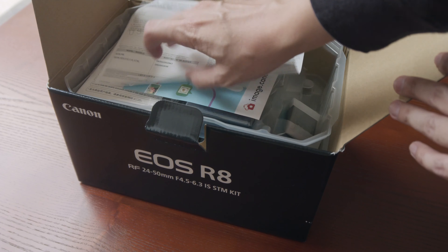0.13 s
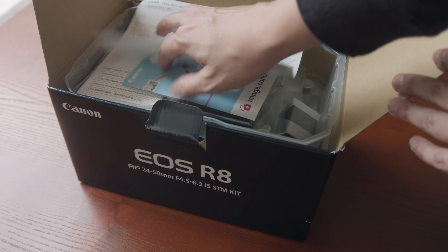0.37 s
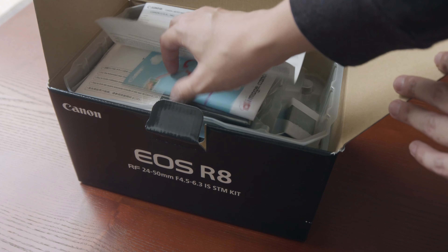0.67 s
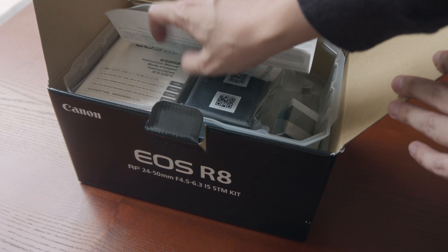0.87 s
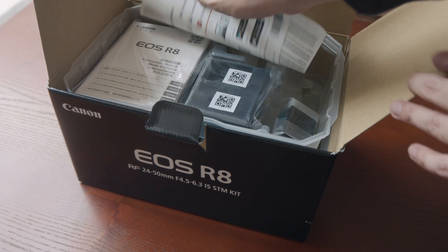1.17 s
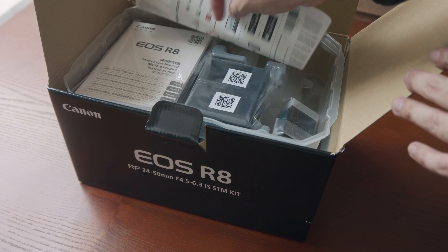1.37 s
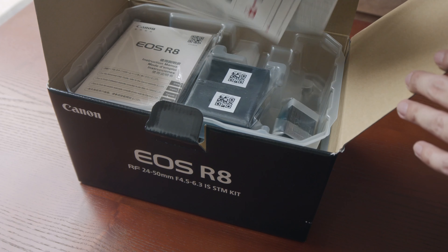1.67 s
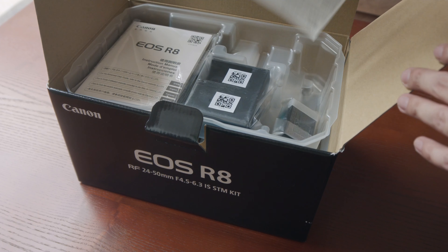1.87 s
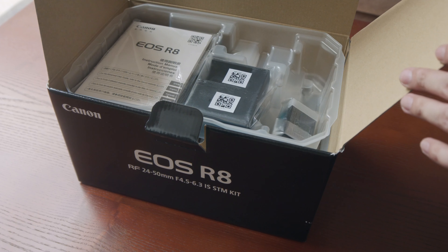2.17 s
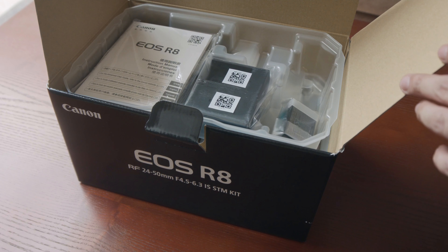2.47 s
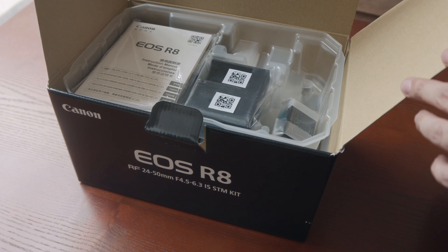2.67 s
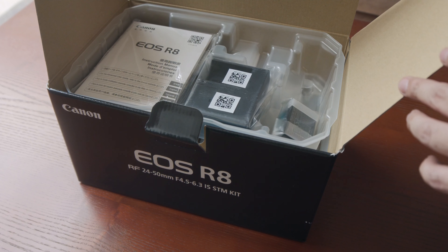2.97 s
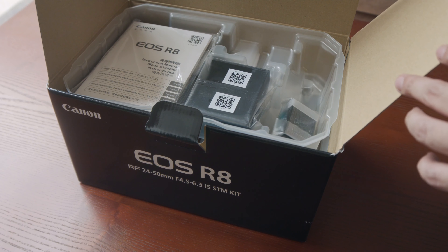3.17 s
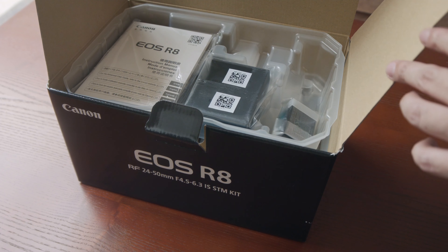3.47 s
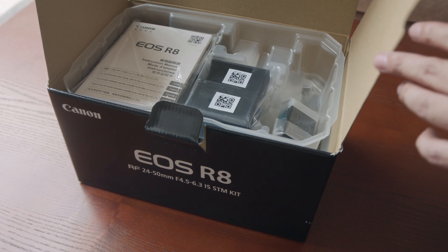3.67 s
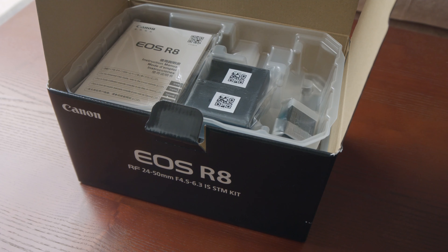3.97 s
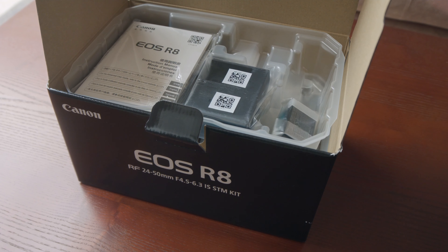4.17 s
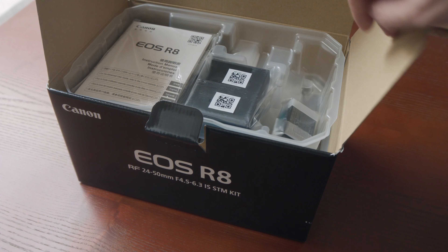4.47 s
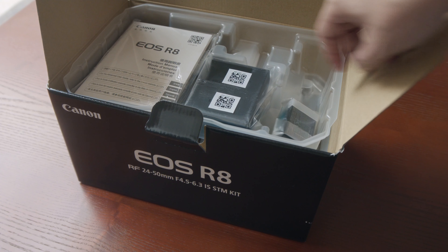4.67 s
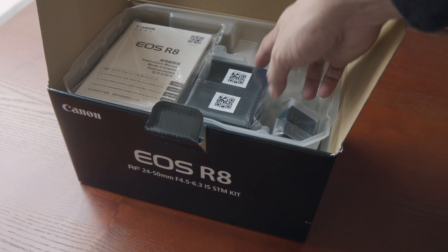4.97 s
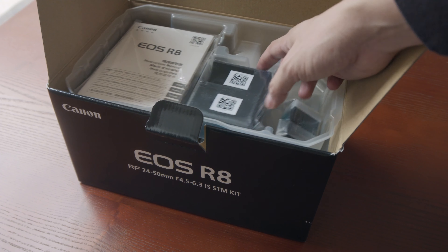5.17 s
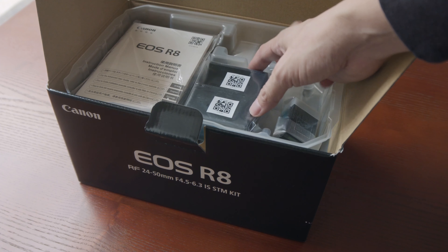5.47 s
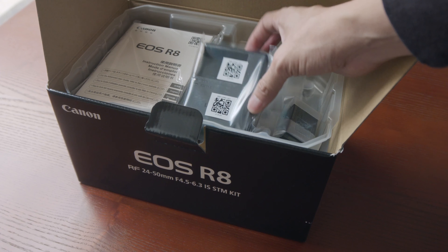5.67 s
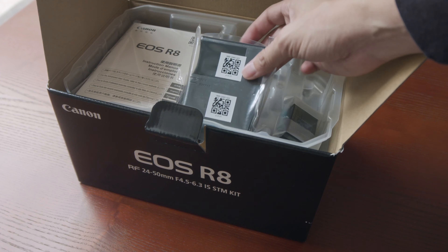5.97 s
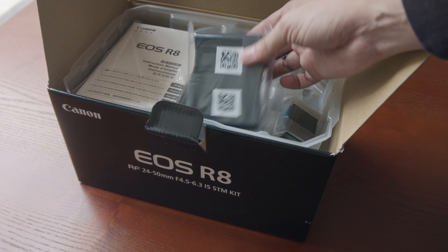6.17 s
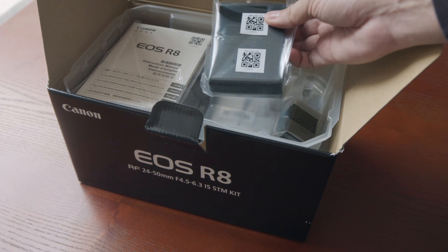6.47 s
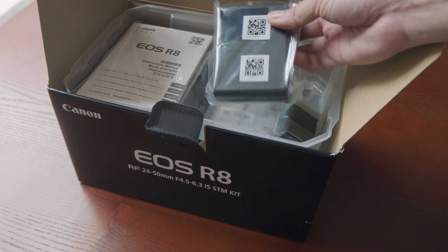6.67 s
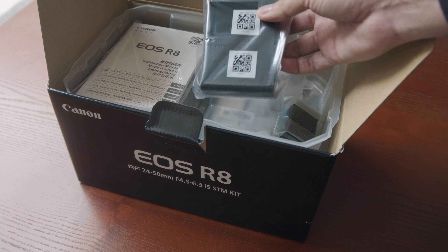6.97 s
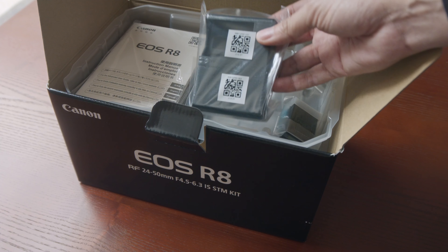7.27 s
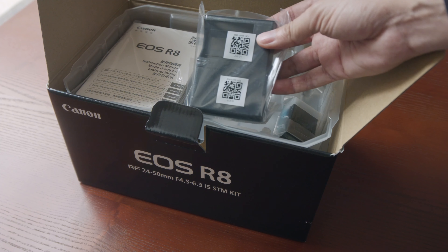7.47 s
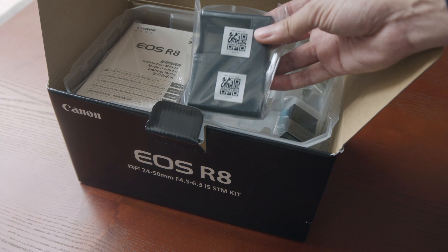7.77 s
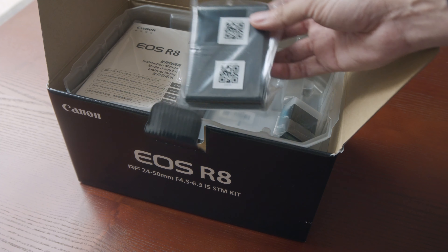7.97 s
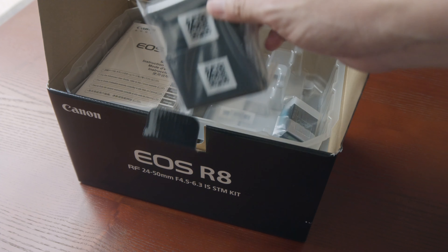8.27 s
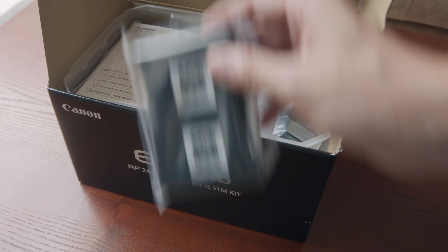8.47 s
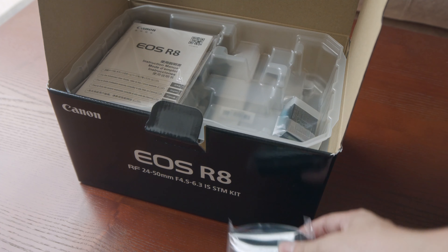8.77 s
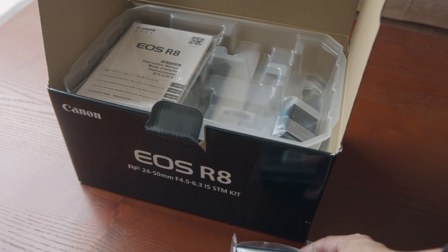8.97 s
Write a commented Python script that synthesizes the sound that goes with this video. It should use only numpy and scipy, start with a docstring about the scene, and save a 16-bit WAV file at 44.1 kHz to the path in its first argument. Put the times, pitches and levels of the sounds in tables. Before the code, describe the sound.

Close handling of papers and thin plastic film in a hollow box, with one sharp snap early on and a solid knock at the end.

```python
"""Hands lift leaflets, a flap and a film-wrapped packet out of a cardboard box on a table in a quiet room.
Creases snap as short cracks and rings of noise; sheets rub and crumple as thousands of tiny slips.
Knocks and rubbing set off the notes of the hollow box, and the hands leave a soft echo in the room.
Behind them an engine speeds up far outside as two low tones, over shaped noise for the room."""
import sys
import numpy as np
from scipy import signal
from scipy.fft import rfft, irfft
from scipy.io import wavfile
from scipy.ndimage import uniform_filter1d

SR = 44100
rng = np.random.default_rng(int(sys.argv[2]) if len(sys.argv) > 2 else 0)


def to_wav(sig):
    """Store sig (one row per channel, or 1-D mono) as 16-bit WAV at the path in sys.argv[1].

    Samples outside -1..1 are clipped; the rate is SR.
    """
    pcm = np.clip(np.atleast_2d(sig), -1, 1) * 32767
    pcm = np.round(pcm).astype(np.int16)
    wavfile.write(sys.argv[1], SR, pcm.T)  # frames by channels


N = 402191  # samples, about 9.12 s


def undb(db):
    """Turn decibels into a plain gain."""
    return 10 ** (np.asarray(db) / 20)


def unit(x):
    """Scale to an average (RMS) level of 1."""
    return x / np.sqrt(np.mean(x ** 2))


def peak(x):
    """Scale so that the largest swing is 1."""
    return x / np.abs(x).max()


def fall(t, t60):
    """A 1.1 ms rise on a fade that loses 60 dB in t60 seconds."""
    return np.exp(-np.log(1000) * t / t60) * np.minimum(t / 0.0011, 1) ** 2


def band(x, lo_hz, hi_hz, order=2):
    """Keep the sound between two pitches."""
    return signal.sosfilt(signal.butter(order, [lo_hz, min(hi_hz, .45 * SR)], "band", fs=SR, output="sos"), x)


def walk(rate):
    """A random level that takes new values rate times a second, smoothed twice; average size 1."""
    hold = int(SR / rate)
    steps = np.repeat(rng.standard_normal(N // hold + 1), hold)
    return unit(uniform_filter1d(uniform_filter1d(steps, hold), hold)[:N])


def curve(rows):
    """Read each table column at every sample, in straight lines between rows."""
    s, *columns = np.transpose(rows)
    return [np.interp(np.arange(N) / SR, s, c) for c in columns]


FILM_FROM_S = 6.2  # from here on the creases are in thin film: broader, with a fainter note
# Creases that snap: (time [s], peak level of the ring [dB], note of the ring [Hz],
# crack level against the ring [dB])
CREASES = [(0.086, -38, 1510, -23), (0.1062, -24, 1710, -28), (0.115, -24.5, 1510, -25),
           (0.247, -29, 3130, -30), (0.27, -26, 2620, -33), (0.442, -41, 1500, -20), (0.485, -34, 1300, -4),
           (0.517, -26, 2950, -28), (0.6047, -35, 1900, -25), (0.679, -29.5, 1200, -27),
           (0.694, -23.5, 1330, -2), (0.951, -29, 1220, -28), (0.998, -40, 1250, -21),
           (1.1395, -38.5, 2530, -20), (1.1876, -39, 3150, -20), (1.2243, -29.5, 1940, -28),
           (1.321, -29, 1360, -4), (1.4074, -30.5, 1180, -25), (1.426, -24, 3230, -30),
           (1.496, -33.5, 3300, -20), (1.5218, -37, 2200, -22), (1.559, -32, 3060, -22),
           (1.8077, -30.5, 1970, -0.5), (1.9007, -35.5, 3000, -27), (2.0042, -33, 1050, -35),
           (2.533, -27.5, 1670, -29), (2.5607, -25.5, 1980, -34), (2.605, -19.5, 1830, -36),
           (2.6548, -48, 2330, -33), (2.815, -25, 2240, -4.5), (2.8296, -17.5, 2430, 1),
           (2.834, -7.5, 2360, -29), (2.8642, -18.5, 1550, -46), (2.8973, -18.5, 3370, -17),
           (2.9132, -1.5, 2586, -35.5), (2.937, -21, 3510, 1), (2.947, -27, 2720, -22),
           (3.1967, -26, 1170, -26), (3.2327, -32.5, 2670, -1), (4.6745, -49, 5500, -8),
           (5.154, -38.5, 2090, -10), (5.177, -40, 1670, -30), (5.2706, -41.5, 1860, -26),
           (5.3245, -33.5, 2360, -8.5), (5.8813, -40, 1640, -6.5), (6.476, -40.5, 1770, -18),
           (6.4937, -36.5, 2570, -27), (6.5088, -40, 2520, -4), (6.563, -43, 2660, 2.5),
           (6.625, -39, 3230, -21), (6.779, -37, 2800, -19), (6.787, -42.5, 3380, -13),
           (6.8916, -35, 2460, -21.5), (6.902, -38, 3280, -13), (7.093, -35, 2510, -35.5),
           (7.408, -42.5, 1820, -20), (8.0673, -40.5, 1570, -1.5), (8.2391, -23, 3300, -3),
           (8.283, -57, 7000, -4), (8.32, -30.5, 5240, -11), (8.351, -47, 5500, -4),
           (8.4278, -31, 1620, -7), (8.432, -34, 2620, -32), (8.541, -25, 2770, -24),
           (8.844, -32, 2720, -3), (8.861, -38, 5900, 9), (8.8722, -21, 3840, -5), (8.958, -19, 1720, -28),
           (8.963, -19, 2020, -4), (9.071, -36.5, 2430, -28), (9.108, -31.5, 2290, -12)]


def snaps():
    """A crease gives way with a sharp high crack, and the sheet rings briefly around one note."""
    out, t = np.zeros(N + SR), np.arange(SR // 10) / SR
    for s, db, hz, crack_db in CREASES + small_ticks():
        crack_noise, ring_noise = rng.standard_normal((2, len(t)))
        width, note_gain = (1.8, 2.13) if s < FILM_FROM_S else (1.9, 1.2)
        crack = band(crack_noise * fall(t, 0.0092), 3040, 7500)
        # a quick fade with a weak, longer tail
        ring = ring_noise * (fall(t, 0.0046) + 0.085 * fall(t, 0.037))
        ring = band(ring, hz / width, hz * width, order=3)
        # the crease's own note stands out
        ring = ring + note_gain * band(ring, hz / 1.037, hz * 1.037, order=1)
        i = int(s * SR)
        out[i:i + len(t)] += undb(db) * (peak(ring) + undb(crack_db) * peak(crack))
    return out[:N]


SHEEN_PER_DB = -0.9348  # dB of sheen per dB of stroke: firmer is duller, counted from a -52 dB stroke
# Firm strokes of sheets rubbing and crumpling: (time [s], length [s],
# level before the touch shape [dB], box against sheet [dB],
# firmest point [share of length, 0-1], note of the sheet [Hz])
STROKES = [(0.084, 0.071, -43, -1.5, 0.35, 1840), (0.242, 0.021, -41.5, -3, 0.4, 2780),
           (0.261, 0.035, -38, -8, 0.1, 2370), (0.435, 0.065, -44.5, 1, 0.22, 2050),
           (0.477, 0.059, -43, 1, 0.5, 1500), (0.68, 0.031, -43, 5.5, 0.56, 1550),
           (0.758, 0.64, -55, -11, 0, 2000), (0.911, 0.055, -42.5, -0.5, 0.7, 2020),
           (0.995, 0.032, -48, 0, 0.1, 1490), (1.224, 0.024, -50, 3.5, 0, 1880),
           (1.32, 0.019, -43, 4.5, 0, 1300), (1.397, 0.087, -45.5, -6.5, 0.34, 2250),
           (1.468, 0.091, -46.5, -13, 0.84, 3000), (1.805, 0.056, -50.5, -11, 0, 2120),
           (2.524, 0.019, -41, -9, 0.43, 2000), (2.545, 0.034, -40, -8, 0.6, 2300),
           (2.598, 0.02, -36.5, -12.5, 0.84, 1970), (2.62, 0.04, -38.5, -22, 0.82, 1570),
           (2.739, 0.029, -47.5, -5, 0.45, 1080), (2.815, 0.055, -30.5, -7, 0.28, 1720),
           (2.884, 0.072, -32.5, -4.5, 0.88, 2890), (3.088, 0.1, -41, -14, 0.65, 5400),
           (3.175, 0.025, -41.5, -2, 0.98, 1270), (4.665, 0.079, -43, 0.5, 0.62, 2050),
           (4.916, 0.091, -48, 5.5, 0.33, 1480), (7.39, 0.027, -63, 9, 0.53, 1830),
           (8.146, 0.026, -44, 0.5, 0.67, 2200)]


def scuffs():
    """Thousands of tiny slips a second, a few far larger, shake the sheet, its sheen and the box."""
    out, t = np.zeros(N + SR), np.arange(SR // 4) / SR  # a stroke sounds for 0.25 s at most

    def slips():
        hits = (rng.random(len(t)) < 4000 / SR) * rng.standard_normal(len(t))
        return hits * undb(1.7 * rng.exponential(size=len(t)))

    for s, length, db, box_db, firmest, note_hz in STROKES + light_touches():
        sheen_db = move(s + length / 2)[-2] + SHEEN_PER_DB * (db + 52.0)
        sheen_db = sheen_db + TOUCH_SPREAD_DB * rng.standard_normal()
        push = slips()
        hollow = unit(box(push, damp=0.061, near_hz=550.))
        hollow = unit(hollow + 2.1 * unit(band(push, 290, 750)))

        # each part of the sheet slips alone; parts above the note are weaker
        rub = 0
        for f in note_hz * 2 ** np.arange(-1.3, 1.3, .5):
            part_db = rng.standard_normal() - 2.5 * max(np.log2(f / note_hz), 0)
            rub = rub + undb(part_db) * unit(band(slips(), f / 1.25, f * 1.25))

        # the bent sheet favours its own note and two more, new at every touch
        def patch(f):
            return unit(band(rub, f / 1.04, f * 1.04, order=1))

        patches = patch(note_hz)
        for f in note_hz * 2 ** rng.uniform(-1, 0.88, size=2):
            patches = patches + patch(f) / 2
        sheen = unit(band(slips(), 2800, 5400) + 0.47 * band(slips(), 4150, 8700))
        sheet = unit(unit(rub) + 0.58 * unit(patches)) + undb(sheen_db) * sheen

        # the contact builds to its firmest point, then slides off
        top = np.clip(firmest, .05, .95) * length
        build = np.minimum(t / top, 1) ** 0.32
        slide = np.maximum(t - top, 0) / (0.87 * (length - top) + 0.0026)
        touch = build * np.exp(-slide ** 1.35)
        i = int(s * SR)
        out[i:i + len(t)] += undb(db) * touch * (sheet + undb(box_db) * hollow)
    return out[:N] * undb(2 * walk(90))  # the grip catches and lets go


# What the hands do in turn: (start [s], end [s], soft rustle level before the touch shape [dB],
# sheet colour [Hz], box against sheet [dB], sheen at a -52 dB stroke [dB], box freedom to ring [0-1])
HAND_MOVES = [(0, 0.898, -54.5, 2080, -4.5, -7, 0.6), (0.898, 1.37, -56.5, 1910, -11, -8, 0.6),
              (1.368, 1.844, -57, 2240, -7.5, -7.5, 0.5), (2.415, 2.779, -60, 1590, -1.5, -10.5, 0.5),
              (2.813, 2.953, -68, 2040, 6, 11.5, 0.3), (2.949, 3.099, -50.5, 2830, -23, 5, 0.1),
              (4.637, 4.924, -57.5, 2300, -3, -10, 0.6), (4.917, 5.075, -70.5, 1560, 20.5, -16, 0.5),
              (5.129, 5.468, -63.5, 1900, 10.5, -15, 0.3), (8.053, 8.423, -61.5, 1710, 0, -16, 0.73),
              (8.835, 9.123, -77.5, 2370, 15, -9, 0.72)]


def move(s):
    """The move under way at time s, else the next one, else the last."""
    return HAND_MOVES[min(np.searchsorted(np.array(HAND_MOVES)[:, 1], s), len(HAND_MOVES) - 1)]


TOUCH_S, TOUCH_SPREAD_DB = 0.09, 2.2  # rough spacing of the soft touches, and how much they vary


def light_touches():
    """Rows like STROKES: the soft rustle is a chain of overlapping light touches in every move."""
    rows = []
    for start, end, db, hz, box_db, *_ in HAND_MOVES:
        count = max(round((end - start) / TOUCH_S), 1)
        step = (end - start) / (count + .5)
        for k, (luck, bend) in enumerate(rng.standard_normal((count, 2))):
            touch_db, note_hz = db + TOUCH_SPREAD_DB * luck, hz * 2 ** (0.31 * bend)
            rows.append((start + k * step, 1.68 * step, touch_db, box_db, .4, note_hz))
    return rows


TICKS_PER_S, TICK_CRACK_DB = 14, -20  # crack level is against the ring
TICK_DB, TICK_SPREAD_DB = 11, 2  # least peak above the soft rustle, and the average extra


def small_ticks():
    """Rows like CREASES: little creases scattered at random through every move."""
    rows = []
    for start, end, db, hz, *_ in HAND_MOVES:
        count = round(TICKS_PER_S * (end - start))
        for when, size, pitch in rng.random((count, 3)):
            tick_db = db + TICK_DB - TICK_SPREAD_DB * np.log(1 - size)
            rows.append((start + when * (end - start), tick_db, hz * 2 ** (1.2 * pitch - 1), TICK_CRACK_DB))
    return rows


# Knocks on the box: (time [s], peak level [dB], favoured note of the box [Hz])
BOX_KNOCKS = [(0.453, -40, 423), (0.517, -33, 473), (0.598, -39, 600), (0.676, -35, 764),
              (0.764, -34.5, 767), (0.82, -33.5, 725), (0.922, -34.5, 412), (0.998, -35.5, 503),
              (1.222, -38, 430), (1.32, -42, 738), (2.831, -30, 230.6), (3.195, -32.5, 617),
              (4.466, -40.5, 845), (5.155, -36.5, 404), (5.177, -31, 571), (5.273, -32, 375),
              (5.327, -32.5, 293), (5.381, -37, 694), (5.399, -35.5, 573), (5.457, -41.5, 523),
              (5.9, -46, 423), (7.41, -51, 405), (8.068, -28, 610), (8.142, -45, 393), (8.24, -36, 308),
              (8.393, -40, 306.4), (8.957, -13.5, 550), (8.972, -13.5, 780), (8.999, -23.5, 696)]


def knocks():
    """A soft blow and its rattling rebound ring the box; the loose contents thud along."""
    out, t = np.zeros(N + SR), np.arange(SR // 4) / SR
    for s, db, hz in BOX_KNOCKS:
        free = move(s)[-1]
        rattle = rng.standard_normal(len(t)) * fall(t, 0.12 * free)
        blow = np.exp(-(t / 0.00018 - 2) ** 2) + 0.12 * rattle
        thud = band(rng.standard_normal(len(t)) * fall(t, 0.07 * free + 0.005), 220, 1650)
        ring = band(box(blow, max(free, .1), hz), min(270, hz / 1.5), 1500)
        i = int(s * SR)
        out[i:i + len(t)] += undb(db) * peak(peak(ring) + 0.2 * peak(thud))
    return out[:N]


# Notes of the hollow box: (note before slight detuning [Hz], level before luck and touched spot [dB],
# time to fade by 60 dB when left free [s])
BOX_NOTES = [(188, -13, 0.26), (323, -4, 0.2), (393, 0, 0.11), (463, -10, 0.1), (538, -12, 0.12),
             (604, -13, 0.1), (716, -5, 0.1), (776, -1, 0.2), (867, -7, 0.12), (969, -11, 0.16),
             (1136, -9, 0.12)]


def box(push, damp, near_hz):
    """The box rings at its own notes, most near the favoured one; a hand on it shortens them."""
    out = 0
    for (hz, db, t60), (level_luck, pitch_luck) in zip(BOX_NOTES, rng.standard_normal((len(BOX_NOTES), 2))):
        r = np.exp(-np.log(1000) / (damp * t60 * SR))  # loss per sample
        w = 2 * np.pi * hz * (1 + 0.0024 * pitch_luck) / SR  # turn per sample
        gain = undb(db + 2 * level_luck - 9 * abs(np.log2(hz / near_hz)))  # 9 dB less per octave away
        out = out + gain * np.sin(w) * signal.lfilter([1], [1, -2 * r * np.cos(w), r * r], push)
    return out


def fidget():
    """Fingers never quite rest: uneven noise makes faint bumps on the card and whispers of film."""
    def touches():
        return rng.standard_normal(N) * undb(3 * walk(25))

    card = unit(band(touches(), 311, 610))
    film = unit(band(touches(), 3500, 5800))
    return undb(-63.5) * card + undb(-77.5) * film


# Far engine: (time [s], firing pitch [Hz], level before wavering [dB],
# level at three times the pitch before wavering [dB])
FAR_ENGINE = [(1.2, 46.75, -83, -57), (1.7, 49, -66, -65), (2.1, 53, -53, -66.5), (2.55, 56.2, -49, -64),
              (2.95, 58.6, -59, -69), (3.45, 59.7, -49.5, -78), (3.9, 59.9, -58, -97), (4.4, 65, -67, -71),
              (5.2, 64.8, -100, -62)]


def engine():
    """A distant motor gains speed: its firing pitch and three times that pitch rise and waver."""
    hz, db, third_db = curve(FAR_ENGINE)
    phase, t = 2 * np.pi * np.cumsum(hz) / SR, np.arange(N) / SR
    # fades in and out over 0.42 s
    heard = np.clip(np.minimum(t - FAR_ENGINE[0][0], FAR_ENGINE[-1][0] - t) / 0.42, 0, 1)
    low = undb(db + 0.5 * walk(22.0)) * np.sin(phase)
    third = undb(third_db + 4.9 * walk(4.43)) * np.sin(3 * phase)
    return heard * np.sqrt(2) * (low + third)


# Tone of the room noise: (pitch [Hz], relative level per Hz [dB])
ROOM_TONE = [(24, -53), (40, -6.5), (64, -1.5), (178, -5.5), (214, -8.5), (377, -14), (1070, -13.5),
             (1280, -14), (2900, -17.5), (9000, -37.5), (11700, -46.5), (19800, -120)]
# Loudness of the room between 300 and 3000 Hz, before flicker: (time [s], level [dB])
ROOM_LEVEL = [(0, -58), (3.5, -57.5), (6, -60.5), (9.12, -62.5)]


def room():
    """Town rumble through the walls and room air: shaped noise whose octaves flicker slightly."""
    hz = np.maximum(np.arange(N // 2 + 1) * SR / N, 1)
    tone_hz, tone_db = np.transpose(ROOM_TONE)
    noise = rfft(rng.standard_normal(N)) * undb(np.interp(np.log(hz), np.log(tone_hz), tone_db))
    scale = np.std(irfft(noise * (hz > 300) * (hz < 3000), N))
    out = 0
    for octave in range(4, 15):
        share = np.clip(1 - np.abs(np.log2(hz) - octave), 0, 1)  # centred on 2 ** octave Hz
        out = out + undb(1.1 * walk(7)) * irfft(noise * share, N)
    return out / scale * undb(curve(ROOM_LEVEL)[0])


ECHO_DB, ECHO_T60_S = -19.5, 0.34  # echo level, and time to fade by 60 dB


def scene():
    """The hands and their soft echo, a fading burst of noise, over the engine and the room."""
    hands = snaps() + knocks() + scuffs() + fidget()
    t = np.arange(SR // 2) / SR
    echo = band(rng.standard_normal(len(t)), 130, 2300, order=1)
    echo = echo * np.exp(-np.log(1000) * t / ECHO_T60_S) * (t > .004)  # starts after 4 ms
    echo = echo / np.sqrt(np.sum(echo ** 2))
    echoed = signal.fftconvolve(hands, echo)[:N]
    return (hands + undb(ECHO_DB) * echoed + engine() + room())[None]


HISS_DB, BASS_CUT_HZ, TOP_HZ = -73.5, 78.3, 15900  # hiss level is before the two cuts


def record(dry):
    """The microphone hisses faintly and cuts the bottom and the top."""
    wet = dry + undb(HISS_DB) * rng.standard_normal(dry.shape)
    wet = signal.sosfilt(signal.butter(3, BASS_CUT_HZ, "high", fs=SR, output="sos"), wet)
    return signal.sosfilt(signal.ellip(10, .2, 60, TOP_HZ, fs=SR, output="sos"), wet)


dry = scene()
out = record(dry)
to_wav(out)
```